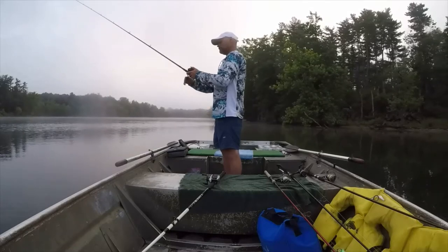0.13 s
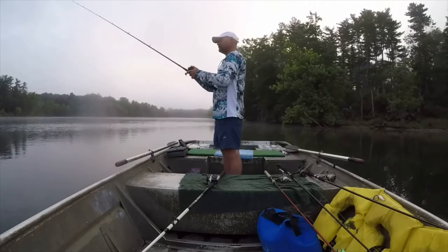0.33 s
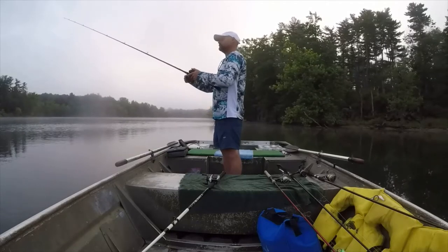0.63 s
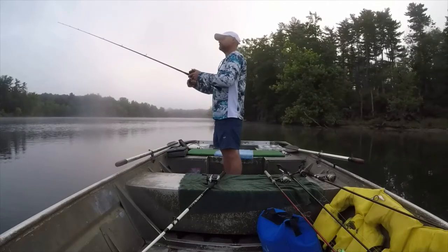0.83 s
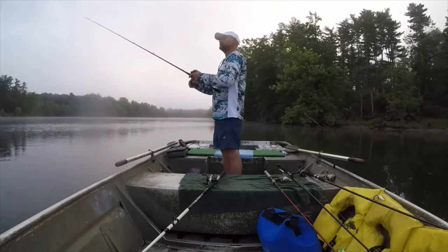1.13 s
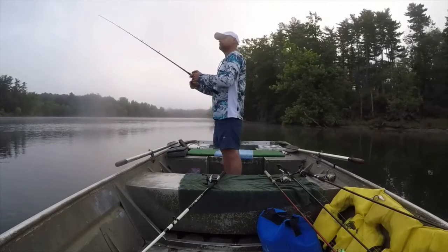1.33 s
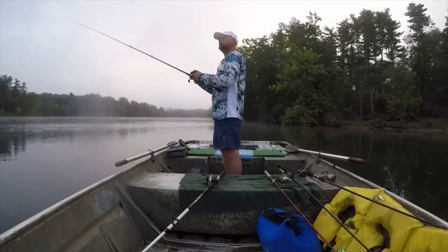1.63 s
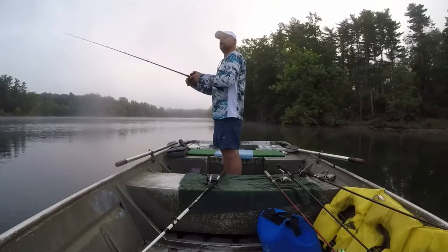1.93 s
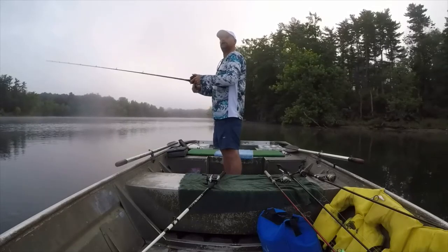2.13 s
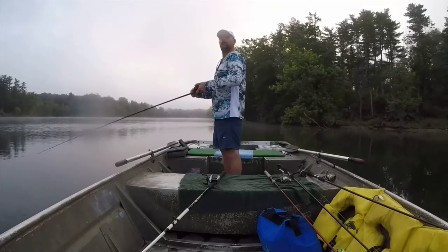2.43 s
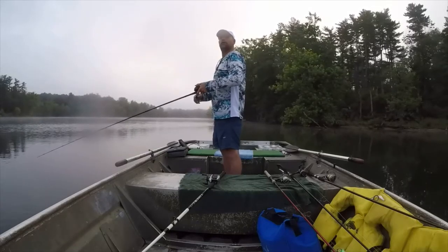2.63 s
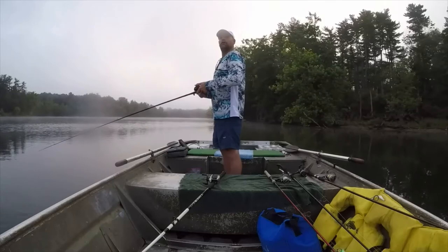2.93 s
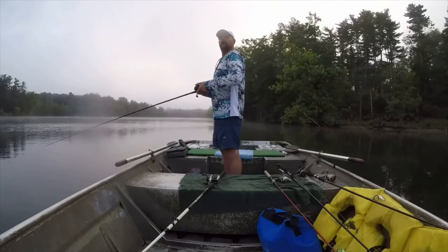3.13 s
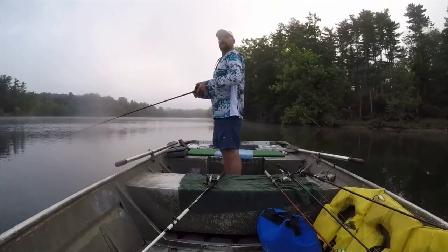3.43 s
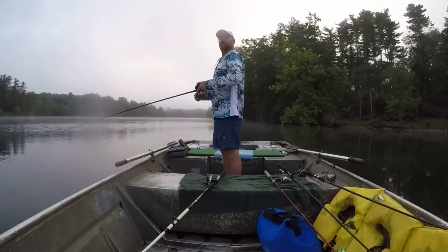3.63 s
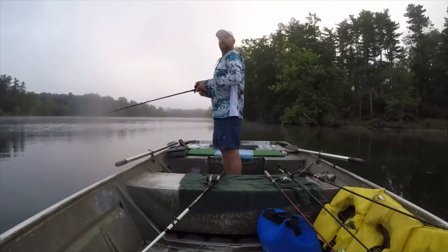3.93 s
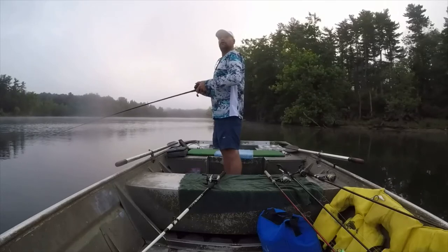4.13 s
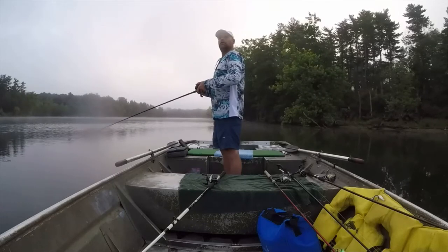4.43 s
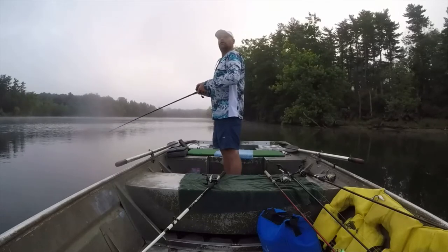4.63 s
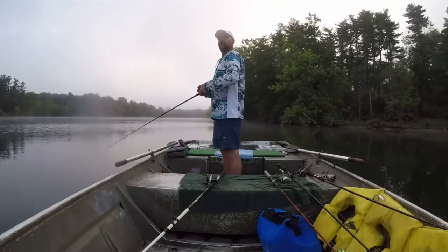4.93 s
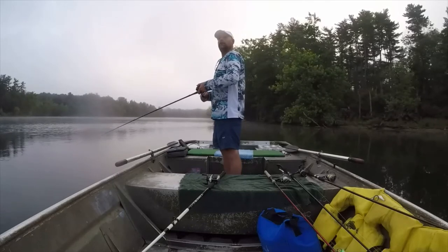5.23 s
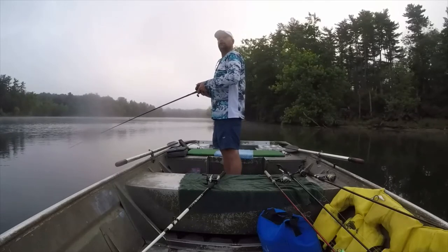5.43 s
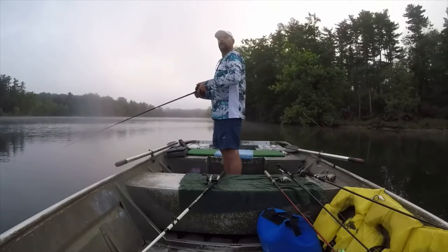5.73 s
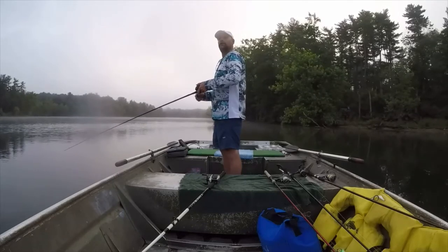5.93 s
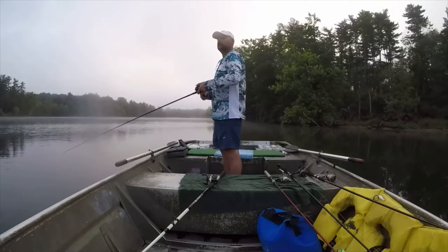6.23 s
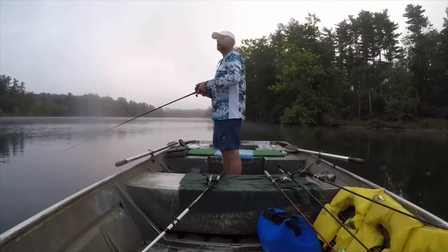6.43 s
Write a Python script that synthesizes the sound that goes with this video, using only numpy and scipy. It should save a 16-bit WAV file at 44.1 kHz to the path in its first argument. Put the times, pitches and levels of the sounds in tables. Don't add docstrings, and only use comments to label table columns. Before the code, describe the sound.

A single crisp metallic clack of a reel close to the microphone, almost dry, then quiet outdoor air. Steady high cricket trilling fills the background with extremely faint tinier insects above it. Small birds call from the shore, chips and sagging whistles at left, buzzy short notes at right, lightly echoing. A far low hum swells gently beneath steady microphone hiss; a barely audible tick comes midway.

```python
import sys
import numpy as np
from scipy import signal
from scipy.fft import rfft, irfft
from scipy.io import wavfile
from scipy.ndimage import uniform_filter1d

SR = 44100
rng = np.random.default_rng(int(sys.argv[2]) if len(sys.argv) > 2 else 0)


def decibels_to_gain(level_db):
    exponent = np.asarray(level_db, float) / 20
    return 10 ** exponent


def put_to_file(sound):
    columns = np.atleast_2d(sound).T
    safe = np.clip(columns, -1, 1)
    whole_steps = np.round(safe * 32767)
    wavfile.write(sys.argv[1], SR, whole_steps.astype(np.int16))


N = 290178
T = np.arange(N) / SR
HZ = np.maximum(np.arange(N // 2 + 1) * SR / N, 1)


def rms_one(x):
    return x / np.sqrt(np.mean(x ** 2) + 1e-20)


def drift(rate_hz):
    return rms_one(irfft(rfft(rng.standard_normal(N)) / (1 + (HZ / rate_hz) ** 2), N))


def ring(x, hz, t60):
    radius = decibels_to_gain(-60 / (t60 * SR))
    angle = 2 * np.pi * hz / SR
    return signal.lfilter([0, np.sin(angle)], [1, -2 * radius * np.cos(angle), radius * radius], x + 1e-18)


def scatter(x, t60):
    t = T[:int(t60 * SR)]
    response = rng.standard_normal(len(t)) * decibels_to_gain(-60 * t / t60)
    return signal.fftconvolve(x, response / np.sqrt(np.sum(response ** 2)))[:N]


def place(x, pan_db, left_lag, wet_db, t60):
    left = irfft(rfft(x) * np.exp(-2j * np.pi * HZ * left_lag / SR), N)
    echoes = decibels_to_gain(wet_db) * np.array([scatter(x, t60), scatter(x, t60)])
    return np.array([left * decibels_to_gain(pan_db / 2), x * decibels_to_gain(-pan_db / 2)]) + echoes


# start_s [s], level_db [dB], thinness [0-1]
REEL_CONTACTS = [(0.045, -43, 1), (.0455, -45, .9), (.0465, -31.5, 0), (0.0467, -23.5, 0.03),
                 (0.047, -21.5, 0.15), (0.0485, -23.5, 0.26), (0.0497, -17.5, 0.68), (0.0501, -21.5, 1),
                 (0.0521, -27, 0.7), (.052, -30, 0.6), (0.0529, -33, 0.09), (0.0548, -36, 0.4),
                 (0.0579, -36.5, 0.16), (0.0608, -38, 0.15), (0.0634, -36, 0.6), (3.678, -49, 0.5)]
# mode_hz [Hz], level_db [dB], t60_s [s]
REEL_MODES = [(458, -15.5, 0.079), (800, -11, 0.029), (1220, -5.5, 0.029), (1560, -4.5, 0.022),
              (1920, -6.5, 0.025), (2550, -6.5, 0.009), (3100, -1.5, 0.012), (3310, -3.5, 0.017),
              (3700, -4, 0.014), (4530, -1.5, 0.014), (5300, -5, 0.012), (5660, -3.5, 0.011),
              (6400, -4.5, .012), (7040, 0, 0.014), (7580, 0, 0.011), (8100, -7.5, 0.016),
              (9150, -7.5, 0.0086), (11800, -7, 0.003), (14200, -14, .003)]
# mode_hz [Hz], level_db [dB], t60_s [s], start_s [s]
CLEAR_RINGS = [
    (4450, -28, .02, .0471),
    (4610, -27, .022, .0471),
    (6940, -23, .026, .0497),
    (7900, -28, .025, .0497),
]


def reel():
    start_s, level_db, thin = np.transpose(REEL_CONTACTS)
    at = np.round(start_s * SR).astype(int)
    out = np.zeros((2, N))
    for hz, mode_db, t60 in REEL_MODES:
        thin_loss_db = 16 * thin * abs(np.log2(hz / 7300))
        strength_db = level_db + mode_db - thin_loss_db + 1.5 * rng.standard_normal((2, len(at)))
        tilt_db = 3 * (hz < 1000) * np.array([[-1], [1]])
        signs = rng.choice([-1, 1], (2, len(at)))
        clicks = np.zeros((2, N))
        clicks[:, at] = decibels_to_gain(strength_db + tilt_db) * (signs if hz > 6000 else signs[0])
        rung = ring(clicks, hz, t60)
        stored = np.sum(clicks ** 2, axis=1) * t60 * SR / (4 * np.log(1000))
        out += rung * np.sqrt(stored / np.sum(rung ** 2, axis=1))[:, None]
    for hz, level_db, t60, s in CLEAR_RINGS:
        click = np.arange(N) == int(s * SR)
        out += ring(decibels_to_gain(level_db + np.array([[-1.5], [1.5]])) * click, hz, t60)
    out = signal.sosfilt(signal.butter(2, [400, 16000], "band", fs=SR, output="sos"), out)
    out = signal.sosfilt(signal.butter(4, 15800, fs=SR, output="sos"), out)
    hull = np.array([scatter(side, .025) for side in out])
    return out + decibels_to_gain(-17) * hull


def notes(tables, burr_hz=172.0, wobble_hz=16.0, flutter_db=1.5, beat=.65, lean=0.82):
    out, wobble, flutter = np.zeros(N), drift(52), drift(56)
    for rows in tables:
        s, pitch_hz, level_db, *burr = np.transpose(rows)
        span = slice(int(s[0] * SR), int(s[-1] * SR))
        t = T[span]
        depth = np.interp(t, s, burr[0]) if burr else 0
        shake = 2 * np.pi * np.cumsum(burr_hz * (1 + 0.13 * flutter[span])) / SR
        hz = np.interp(t, s, pitch_hz) + wobble_hz * (1 + 3 * depth) * wobble[span]
        phase = 2 * np.pi * np.cumsum(hz) / SR
        edges = np.clip(np.minimum(t - s[0], s[-1] - t) / 0.0021, 0, 1)
        level = decibels_to_gain(np.interp(t, s, level_db) + flutter_db * (0.5 + depth) * flutter[span]) * edges
        beating = 1 + beat * depth * np.cos(shake)
        out[span] += np.sqrt(2) * level * beating * np.sin(phase - lean * depth * np.sin(shake))
    return out


def arch(s, length, from_hz, to_hz, db, burr=0):
    share = np.array([0, .3, 1])
    pitch_hz = from_hz + (to_hz - from_hz) * share
    return np.transpose([s + length * share, pitch_hz, db - np.array([10, 0, 9]), burr + 0 * share])


# start_s [s], length_s [s], top_hz [Hz], level_db [dB], soft_start_db [dB], burr [0-1]
WHISTLES = [
    (1.709, 0.35, 3450, -57.5, -9, 0.12),
    (3.931, 0.4, 3520, -64, -8.5, .35),
]
# middle_s [s], dip_hz [Hz], dip_db [dB]
VOICE_BREAKS = [
    (1.915, 90, 2),
    (4.05, 0, 8),
    (4.21, 20, 3),
    (4.31, 0, 6),
    (4.325, 0, 6),
    (1.772, 0, 6),
]
# start_s [s], rise_s [s], hold_s [s], top_hz [Hz], level_db [dB]
UPSLURS = [
    (4.5, .052, 0.066, 3165, -62),
]
# start_s [s], length_s [s], from_hz [Hz], to_hz [Hz], level_db [dB]
RASPS = [
    (2.05, 0.07, 2950, 2650, -71),
    (4.29, 0.1, 3000, 2950, -73),
    (4.615, .055, 3130, 2960, -63.5),
    (4.665, 0.06, 2720, 2600, -69),
]
UNDER_RATIO, UNDER_DB, UNDER_OCTAVE_DB = .755, -72, -82
UPSLUR_HZ, TRAIL_S, TRAIL_DB = 460, 0.15, -10


def whistles():
    tables = []
    for s, length, top_hz, db, soft_db, burr in WHISTLES:
        t = np.arange(0, length, .004)
        dip_hz, dip_db = sum(np.exp(-((s + t - at) / 0.0098) ** 2) * np.array([[hz], [loss]])
                             for at, hz, loss in VOICE_BREAKS)
        scoop_hz = 867 * np.exp(-t / .017)
        sag_hz = 700 * t + 2000 * t ** 2
        hz = top_hz - scoop_hz - sag_hz - dip_hz
        corners_s = length - np.array([length, 0.21 + 0.054, 0.21, 0.043, 0])
        level = db + np.interp(t, corners_s, [soft_db, soft_db, 0, 0, -9])
        under = UNDER_DB + .6 * (-62 - db) - 70 * (t / length - .58) ** 2
        tables += [np.transpose([s + t, hz, level - dip_db, burr + 0 * t]),
                   np.transpose([s + t, UNDER_RATIO * hz, under])]
    for s, rise, hold, top_hz, db in UPSLURS:
        low_hz, end = top_hz - UPSLUR_HZ, s + rise + hold
        under_from, under_to = UNDER_RATIO * low_hz, UNDER_RATIO * (top_hz - 150)
        tables += [[(s, low_hz, db - 3),
                    (s + 0.45 * rise, low_hz + 0.4 * UPSLUR_HZ, db - 7),
                    (s + 0.69 * rise, low_hz + 0.63 * UPSLUR_HZ, db + 5),
                    (s + rise, top_hz, db),
                    (end, top_hz, db),
                    (end + .02, top_hz - 20, db + TRAIL_DB),
                    (end + TRAIL_S, top_hz - 30, db + TRAIL_DB)],
                   arch(s, rise, under_from, under_to, UNDER_DB - 3),
                   arch(s, rise, 2 * under_from, 2 * under_to, UNDER_OCTAVE_DB)]
    rasps = [arch(*row, burr=0.85) for row in RASPS]
    return notes(tables + rasps, wobble_hz=10, flutter_db=2.0)


# middle_s [s], middle_hz [Hz], level_db [dB], length_s [s], slide_hz [Hz]
CHIPS = [(0.830, 3070, -56, .012, 900), (.899, 3100, -55, .010, 1150), (0.981, 2920, -55, .013, 950),
         (1.689, 3050, -53, .008, 1000), (2.193, 3350, -54, .016, 850), (2.263, 3050, -57, .010, 1000),
         (2.361, 3120, -56.5, .013, 750), (3.235, 3150, -53, .014, 950), (3.249, 3800, -62, .012, 100),
         (3.259, 3400, -61, .010, -700), (3.323, 3040, -56.5, .012, 800), (5.589, 3300, -55, .016, 600),
         (5.603, 3720, -64, .012, 200), (5.653, 3160, -57, .011, 900), (5.745, 3200, -53, .008, 850),
         (4.51, 4200, -66, .010, 100)]


def chips():
    tables = []
    for s, hz, db, length, slide_hz in CHIPS:
        tables.append([(s - length / 2, hz - slide_hz / 2, db - 7),
                       (s, hz, db),
                       (s + length / 2, hz + slide_hz / 2, db - 2.5)])
    return notes(tables)


# start_s [s], length_s [s], rise_s [s], crest_hz [Hz], level_db [dB], fade_db [dB],
# lean of the burr to the low side [0-1]
SONG = [
    (1.03, 0.335, 0.04, 3690, -65, 2, .5),
    (1.466, 0.15, 0.018, 3900, -63.5, 7, 0),
    (1.618, 0.15, 0.019, 3900, -63.5, 6, 0),
    (1.775, 0.15, 0.018, 3850, -65.5, 5, .1),
]


def song():
    from_hz, hold_hz, settle_s = 3050, 3680, .04
    out = 0
    for s, length, rise, crest_hz, db, fade_db, lean in SONG:
        t = np.arange(0, length, .004)
        settling = (crest_hz - hold_hz) * np.exp(-(t / settle_s) ** 2)
        climb = (crest_hz - from_hz) * np.exp(-(t / rise) ** 1.42)
        hz = hold_hz + settling - climb
        level = db + np.interp(t, [0, rise, 1.4 * rise, length - .02, length],
                               [-8, -2, 0, -fade_db, -fade_db - 14])
        burr = np.interp(t, [0, 2.5 * rise, .5 * length, .65 * length], [.25, .85, .85, .15])
        out = out + notes([np.transpose([s + t, hz, level, burr])], wobble_hz=7, flutter_db=1.5,
                          beat=1.3 - 1.1 * lean, lean=lean)
    return out


# start_s [s], length_s [s], from_hz [Hz], to_hz [Hz], level_db [dB]
FAR_NOTES = [(1.41, .085, 2540, 2500, -65.5), (1.572, 0.07, 2580, 2540, -67),
             (1.725, 0.07, 2600, 2570, -70), (.69, 0.15, 3350, 3300, -70.5), (.835, .06, 3300, 3280, -70),
             (2.196, 0.085, 3020, 3000, -68.5), (2.3, .17, 3860, 3840, -75), (2.69, .07, 3330, 3460, -68),
             (2.95, 0.034, 3290, 3280, -68), (6.14, .05, 3130, 3150, -74), (1.15, .07, 3930, 3930, -72),
             (4.33, .07, 3290, 3270, -73)]


def far_notes():
    return notes([arch(*row, burr=.25) for row in FAR_NOTES], flutter_db=1.5, wobble_hz=12)


# stroke_rate [strokes/s], start [cycles], wing_hz [Hz], core_hz [Hz width], skirt_hz [Hz width],
# skirt_db [dB], level_db [dB]
CRICKETS = [
    (40.87, .80, 5310, 110, 400, -4, -3.5),
    (41.14, .47, 5545, 100, 330, -4, -2.5),
]
# middle_s [s], half_length_s [s]
LULLS = [
    (.25, 0.42),
    (3.2, 0.55),
]


def cricket():
    throb, lull_throb, evenness, tone_share = .95, .45, .9, .7
    depth = throb - (throb - lull_throb) * sum(np.exp(-((T - s) / half) ** 4) for s, half in LULLS)
    out = 0
    for rate, start, hz, core_hz, skirt_hz, skirt_db, db in CRICKETS:
        cycle = start + rate * T + .03 * drift(1.5)
        beat = np.cos(2 * np.pi * cycle) - 0.24 * np.cos(4 * np.pi * cycle)
        strokes = 1 - .54 * np.clip(depth, 0, 1) * beat
        core = 1 / (1 + (2 * (HZ - hz) / core_hz) ** 4)
        skirt = decibels_to_gain(2 * skirt_db) / (1 + (2 * (HZ - hz) / skirt_hz) ** 4)
        rattle = rms_one(irfft(rfft(strokes * rng.standard_normal(N)) * np.sqrt(core + skirt), N))
        effort = uniform_filter1d(rattle ** 2, size=int(2 * SR / rate))
        rattle = rms_one(rattle / effort ** (evenness / 2))
        stroke_db = .3 * rng.standard_normal(int(cycle.max()) + 2)
        spread_db = stroke_db[np.maximum(cycle, 0).astype(int)]
        wing_phase = 2 * np.pi * np.cumsum(hz + 92 * drift(220)) / SR
        tone = strokes * decibels_to_gain(spread_db) * np.sin(wing_phase)
        voice = np.sqrt(tone_share) * rms_one(tone) + np.sqrt(1 - tone_share) * rattle
        out = out + decibels_to_gain(db) * voice
    level_db = -64 - 0.01 * T
    return place(decibels_to_gain(level_db) * out, pan_db=-3.0, left_lag=9.7, wet_db=-14, t60=.12)


# pitch_hz [Hz], width_hz [Hz], level_db [dB], throb_rate [throbs/s]
TINY_INSECTS = [
    (11748, 4, -85, 5.3),
    (12252, 4, -89.5, 5.4),
]


def tiny_insects():
    out = 0
    for hz, width_hz, level_db, throb in TINY_INSECTS:
        voice = rms_one(ring(rng.standard_normal(N), hz, 2.2 / width_hz))
        out = out + decibels_to_gain(level_db) * voice * (1 + 0.15 * np.sin(2 * np.pi * throb * T))
    return np.array([out, out])


def over_hz(rows):
    hz, *columns = np.transpose(rows)
    return [np.interp(np.log(HZ), np.log(hz), c) for c in columns]


# freq_hz [Hz], left-right likeness [-1 to 1], left-right level_db [dB]
PAIR = [(40, -0.19, -5), (143, 0.78, -1), (270, 0.0056, -3), (477, -0.61, 0), (850, -0.81, -0.5),
        (1490, -0.58, 0), (2200, -0.28, 0.2), (2980, 0.11, 0.5), (4170, 0.58, 1), (5170, -0.31, -2.5),
        (6430, -0.13, -1), (8200, 0.061, -2), (10500, -0.051, -3), (12000, -0.024, 0)]


def wide_noise(spectrum):
    alike, pan_db = over_hz(PAIR)
    alike = np.clip(alike, -.95, .95)
    mid, side = rfft(rng.standard_normal((2, N))) * decibels_to_gain(over_hz(spectrum)[0])
    side = side * np.sqrt((1 - alike) / (1 + alike))
    both = irfft([(mid + side) * decibels_to_gain(pan_db / 2), (mid - side) * decibels_to_gain(-pan_db / 2)], N)
    return both / np.sqrt(np.mean(both.mean(axis=0) ** 2))


# freq_hz [Hz], density_db [dB per Hz]
HUM = [(15, -66), (25, -63), (85, -25), (97, -41.5), (131, -9.5), (152, 3), (166, 0.5), (193, -7.5),
       (230, -6), (284, -15), (500, -33), (650, -32), (1100, -120)]
# time_s [s], level_db [dB]
HUM_SWELL = [(0.15, -49.5), (0.33, -51), (0.97, -48.5), (2.07, -50.5), (2.19, -46.5), (2.41, -51),
             (3.57, -47), (4.3, -50), (6.58, -50.5)]


def hum():
    time_s, level_db = np.transpose(HUM_SWELL)
    return decibels_to_gain(np.interp(T, time_s, level_db)) * wide_noise(HUM)


# freq_hz [Hz], density_db [dB per Hz]
HISS = [(180, -21), (300, -2.5), (455, -6), (850, -10), (1230, -12), (1930, -16), (3290, -18.5),
        (4300, -21.5), (6000, -19.5), (7800, -20.5), (9900, -22), (12100, -29), (13500, -32), (15200, -37)]


def hiss():
    return decibels_to_gain(-56.5) * wide_noise(HISS)


def scene():
    left_bird = place(whistles() + decibels_to_gain(-4) * chips(), pan_db=10, left_lag=-1.5, wet_db=-3, t60=.5)
    right_bird = place(song() + far_notes(), pan_db=-8, left_lag=1.5, wet_db=-1, t60=.3)
    far = left_bird + right_bird + cricket() + tiny_insects() + hum() + hiss()
    return irfft(rfft(far) * (HZ < 15150), N) + reel()


def band_limit(x):
    return signal.sosfilt(signal.butter(12, 16500, fs=SR, output="sos"), x)


def record(dry):
    return band_limit(dry)


dry = scene()
out = record(dry)
put_to_file(out)
```